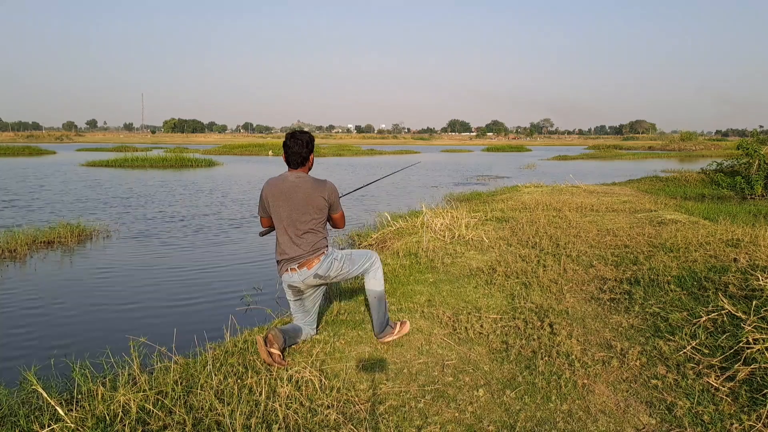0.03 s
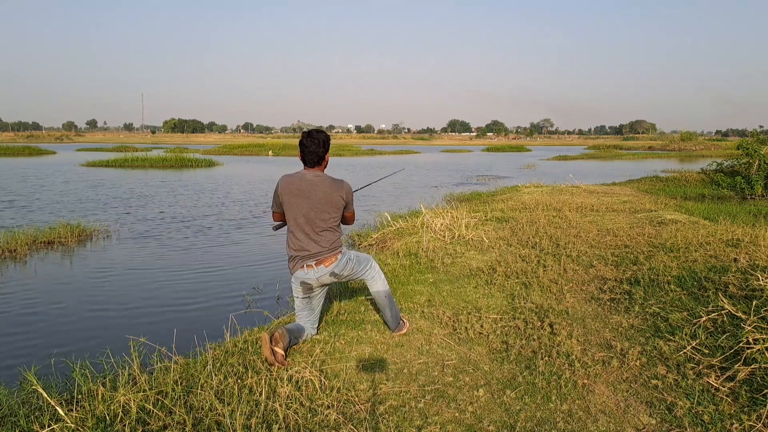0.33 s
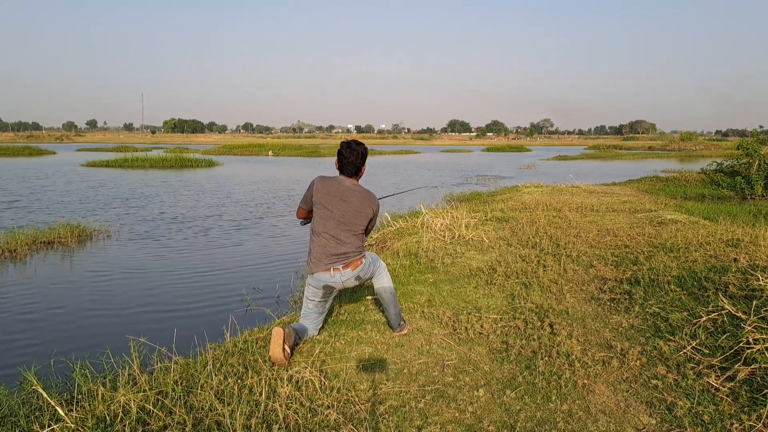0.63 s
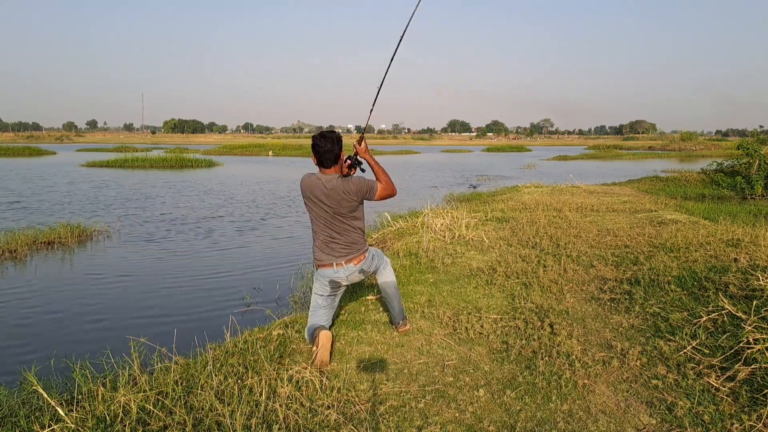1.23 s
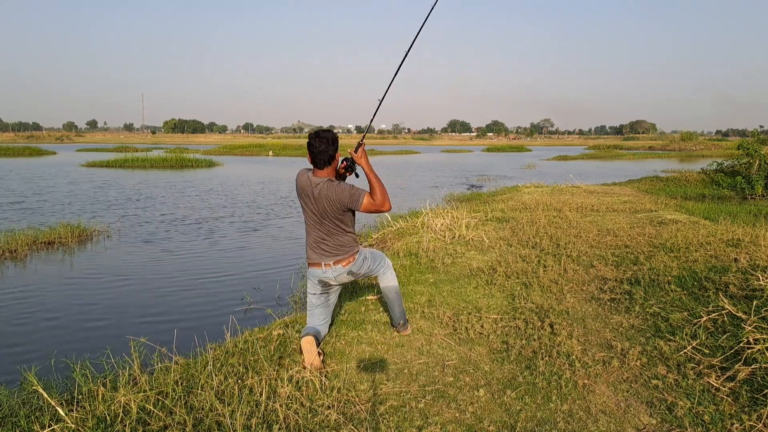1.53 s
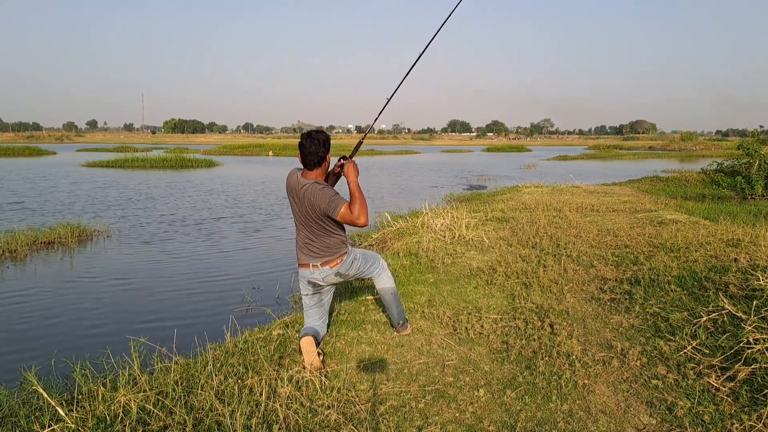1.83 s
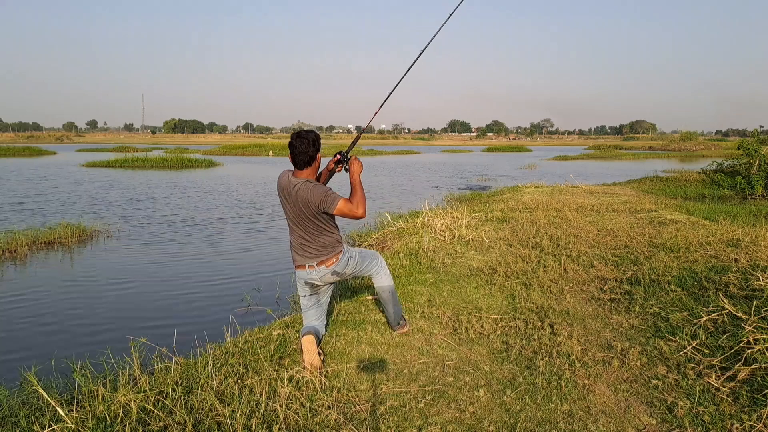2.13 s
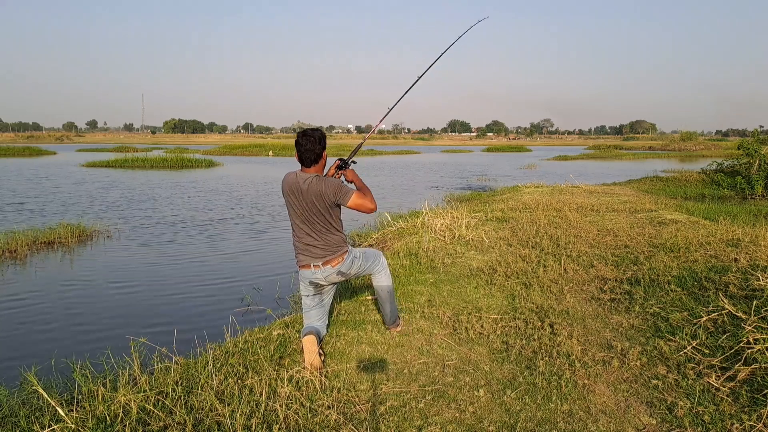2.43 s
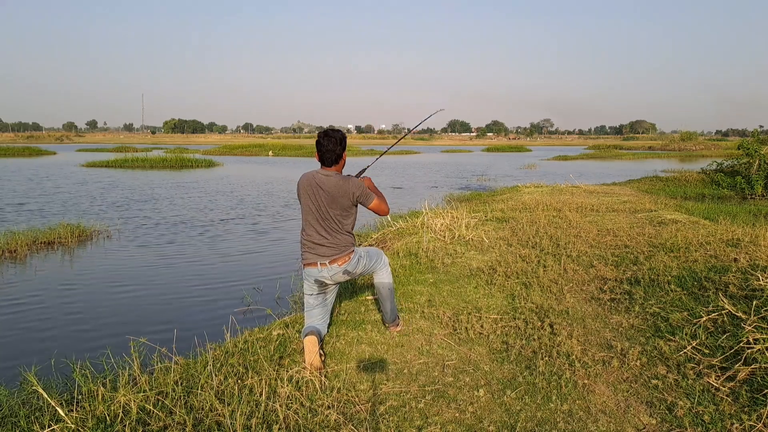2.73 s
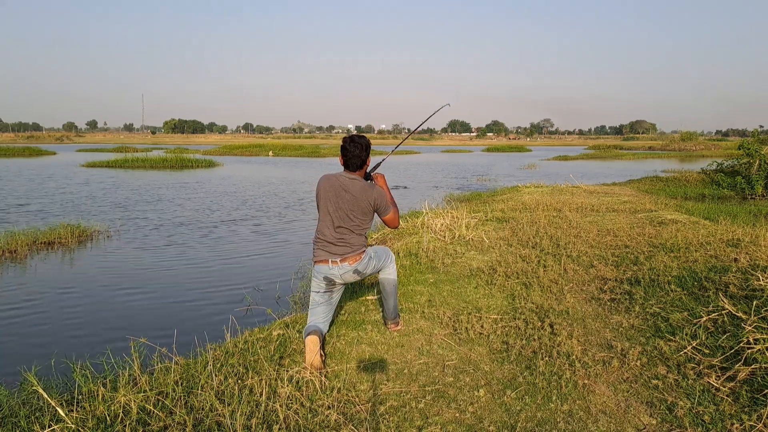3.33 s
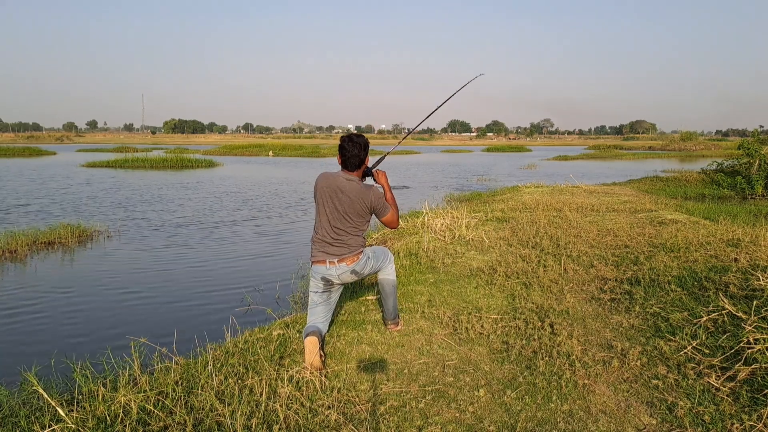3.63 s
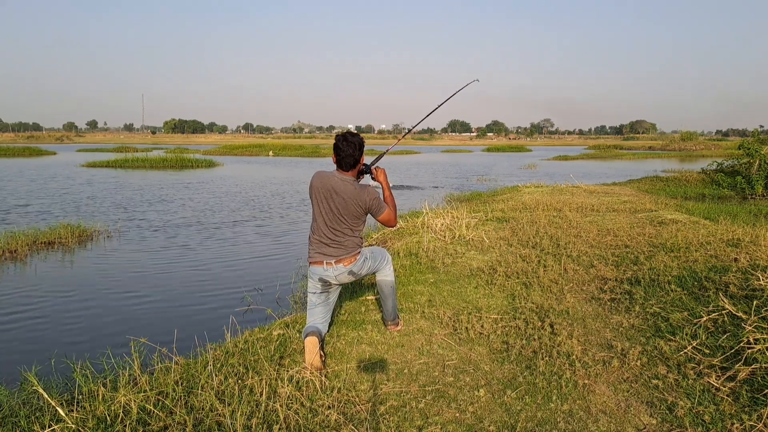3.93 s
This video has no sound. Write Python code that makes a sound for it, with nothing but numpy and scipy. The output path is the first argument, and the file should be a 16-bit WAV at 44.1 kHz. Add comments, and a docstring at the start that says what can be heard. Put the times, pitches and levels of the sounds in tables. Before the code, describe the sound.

Short, raspy bird yelps repeat nearby, answered by softer mews and distant chips across a pond. A cricket buzzes steadily louder as a fishing rod swishes and two bouts of splashing follow. Light wind bumps the microphone.

```python
"""A wading bird yelps close by on the right of a pond, its clean voice breaking into a rasp.
A second bird mews back from the left, small birds chip far off, and the banks return a thin echo.
A bush cricket buzzes in quick chirps of wing strokes over a bed of other insects.
A fishing rod whips up, the water splashes and gurgles in two bouts,
and a light wind thumps on the two microphone ports."""
import sys
import numpy as np
from scipy import signal
from scipy.fft import rfft, irfft, next_fast_len
from scipy.io import wavfile
from scipy.ndimage import map_coordinates

SR = 44100
rng = np.random.default_rng(int(sys.argv[2]) if len(sys.argv) > 2 else 0)


def transcribe(u):
    """Save the signal u as a 16-bit wav file named by the first command-line argument.

    u: samples, shape (n,) or (channels, n), limited to [-1, 1]; the rate is SR.
    q: integer samples, one column per channel.
    """
    v = np.clip(np.atleast_2d(u).T, -1, 1)
    q = np.round(v * 32767).astype(np.int16)
    wavfile.write(sys.argv[1], SR, q)


N = 176400
T = np.arange(N) / SR

# Hiss of still air. Each row: frequency in Hz, gain in dB.
AIR_SPECTRUM = [(200, 2), (600, -3), (2000, -3), (4200, -1.5), (6500, -13.5), (15500, -19.5)]
# Low end of the wind. Each row: frequency in Hz, gain in dB.
RUMBLE_SPECTRUM = [(20, -48), (35, -6.5), (52, 1.5), (75, -3.5), (110, -8), (170, -19), (300, -31.5),
                   (700, -62)]
# Eddies on the ports. Each row: centre and half-width in seconds, left and right relative level in dB.
WIND_THUMPS = [(0.404, 0.013, -37, -17), (0.488, 0.015, -35, -19), (0.968, 0.012, -32, -21),
               (1.655, 0.059, -35, -20.5), (1.853, 0.029, -22.5, -21.5), (2.741, 0.01105, -32, -22),
               (2.907, 0.022, -49, -19), (3.095, 0.0104, -24.5, -52), (3.313, 0.082, -32.5, -24.5),
               (3.511, 0.012, -31, -11.5), (3.732, 0.0081, -31.5, -16), (3.953, 0.035, -23, -16)]
# Echo off the banks. Each row: frequency in Hz, seconds to fall 60 dB.
BANK_DECAY = [(300, 0.27), (1200, 0.37), (3000, 0.25), (6000, 0.23), (12000, 0.082)]
# The insect bed. Each row: frequency in Hz, gain in dB.
INSECT_SPECTRUM = [(6500, -34.5), (7600, -19), (8150, -5), (8500, -3.5), (8900, -11), (9600, -25.5),
                   (11000, -31)]
# Faint far calls. Each row: start and length in seconds, first and last pitch in Hz, level in dB.
FAR_HOOTS = [(.56, 0.15, 596, 634.8, -52.5), (.78, 0.642, 594, 496, -54), (1.98, 0.123, 1370, 1321, -52.5)]
# Short chips of small birds and two faint, longer distant mews.
# Each row: start and length in seconds, first and last pitch in Hz, level in dB.
FAR_BIRD_NOTES = [(0.053, 0.024, 2765, 2560, -37), (2.168, 0.026, 4960, 4300, -45.5),
                  (2.278, 0.027, 4273, 3470, -40.5), (2.633, 0.024, 4300, 3220, -37.5),
                  (-.04, 0.12, 2500, 2500, -42), (1.08, 0.15, 2750, 2897, -46),
                  (1.577, .032, 4300, 3300, -43), (1.735, .04, 3000, 2650, -47),
                  (2.25, 0.031, 3800, 3760, -46), (2.94, 0.051, 2820, 2680, -40.5),
                  (3.015, 0.038, 2840, 2570, -42)]
# The cricket's pace and effort. Each row: chirp number, its end in seconds, relative level in dB.
CHIRP_KEYFRAMES = [(0, 0.084, -51.5), (4, .571, -47), (7, .901, -40.5), (10.1, 1.212, -38.5),
                   (13.88, 1.667, -37.5), (21.02, 2.504, -36), (34, 4.035, -32)]
# Air swishing past the rod. Each row: frequency in Hz, gain in dB.
WHIP_SPECTRUM = [(150, -17), (400, -6), (600, -3.5), (900, -13), (1400, -38), (4000, -25), (10000, -16.5),
                 (16000, -24)]
# Hiss of the line. Each row: frequency in Hz, gain in dB.
LINE_SPECTRUM = [(500, -6.5), (2500, 4), (5000, 4), (12000, -1), (16000, -24)]
# Sleeves and line rustling. Each row: centre in seconds, level in dB.
RUSTLES = [(.03, -48), (.95, -47.5), (1.3, -48.5), (1.85, -48.5)]
# Heaves of water. Each row: peak in seconds, level in dB, seconds to fall 60 dB.
SLOSHES = [(1.598, -29, 0.8), (3.919, -21.5, 0.1)]
# Body of a slosh. Each row: frequency in Hz, gain in dB.
SLOSH_SPECTRUM = [(70, -1), (140, 6.5), (260, -5.5), (450, -10.5), (900, -52)]
# Splashes. Each row: peak in seconds, relative level in dB, attack in seconds, seconds to fall 60 dB.
SPLASHES = [(1.41, -50.5, 0.065, 2.3), (1.594, -41, 0.078, 0.41), (1.75, -52, 0.019, 1.6),
            (3.48, -46, 0.074, 5), (3.647, -30.5, 0.022, 0.36), (3.68, -39, 0.013, 1.2),
            (3.79, -41.5, 0.052, 1), (3.913, -39, 0.025, 1.5)]
# Colour of the spray. Each row: frequency in Hz, gain in dB.
SPRAY_SPECTRUM = [(100, 7), (300, -6), (800, -3), (1700, -1.5), (3000, -7.5), (6000, -16), (11000, -21.5),
                  (16000, -34)]
# Large bubbles. Each row: start in seconds, first pitch in Hz, relative level in dB,
# rise per second as a multiple of that pitch.
BUBBLES = [(1.602, 158, -13.5, 7.7), (3.636, 764, -26, 15), (3.645, 698, -22.5, 51),
           (3.677, 1194, -27.5, 130), (3.783, 484, -28.5, 195)]
# The answering bird. Each row: start and length in seconds, top pitch in Hz, relative level in dB,
# seconds to the top, fall as a share of pitch, lift of the third and fourth harmonics in dB.
MEWS = [(.18, .11, 1412, -38.5, 0.032, 0.082, 0.5, -7), (0.537, 0.091, 1376, -40, 0.035, 0.085, -1, -1.5),
        (1.196, 0.13, 1444, -35, 0.026, 0.16, -4.5, 0), (1.841, .122, 1457, -36, 0.046, 0.15, -6.5, 4),
        (2.452, .11, 1489, -38.5, 0.022, .05, 3, 5), (2.834, 0.108, 1384, -37.5, 0.0178, 0.0305, -10, 11),
        (3.204, 0.097, 1461, -36, 0.025, 0.067, 4.5, 3), (3.604, 0.11, 1390, -32.5, 0.047, 0.052, 2, -4)]
# The answering bird's throat resonances. Each row: frequency in Hz, gain in dB.
MEW_THROAT = [(1400, -22.5), (2800, 3.5), (4250, 1), (5700, -7.5), (7100, -10), (15000, -37)]
# The near bird. Each row: start and length in seconds, pitch in Hz, relative level in dB, seconds to the
# break, level change at the break in dB, left over right in dB, share of pitch by which it starts flat.
YELPS = [(0.285, 0.11, 1245, -20, 0.044, -9, -1, 0.032), (0.82, 0.0527, 1273, -23, 0.12, -7, 3, 0.092),
         (1.366, 0.16, 1230, -23, 0.037, -6.5, -2, 0.0077),
         (2.519, 0.12, 1210, -23.5, 0.047, -8.5, -2.5, 0.0148),
         (3.423, 0.11, 1233, -25, 0.048, -7, -4, 0.063)]
# The near bird's throat resonances. Each row: frequency in Hz, gain in dB.
YELP_THROAT = [(1150, -23), (1600, -31), (2150, 0), (2480, -4), (3200, 2), (3700, 3.5), (4400, -5),
               (4950, -7), (5500, -10.5), (6150, -4), (7400, -20), (11000, -21), (15000, -28.5)]
# Hoarse noise between its harmonics. Each row: frequency in Hz, gain in dB.
HOARSE_SPECTRUM = [(1800, -34.5), (2400, 1), (3050, 1), (3900, -2), (6000, -19), (10000, -32)]


def amp(db):
    """Decibels to gain."""
    return 10 ** (np.asarray(db) / 20)


def unit(x):
    """Scale to rms 1."""
    return x / np.sqrt(np.mean(x ** 2) + 1e-20)


def along(points, hz):
    """Read a curve of (Hz, value) points on a log frequency axis."""
    freqs, values = np.transpose(points)
    return np.interp(np.log(hz + 1), np.log(freqs + 1), values)


def wobble(rate, size=N):
    """A smooth random modulator with rate knots a second."""
    knots = rng.standard_normal(size // 8 + 8)
    return map_coordinates(knots, [np.arange(size) * rate / SR], mode="wrap")


def filtered(x, response):
    """Shape x with a gain given as a function of Hz."""
    size = next_fast_len(N + SR // 2)
    return irfft(rfft(x, size) * response(np.fft.rfftfreq(size, 1 / SR)), size)[..., :N]


def noise(spectrum, width):
    """Coloured stereo noise of rms 1; width 0 is mono, 1 fully wide."""
    mid, side = filtered(rng.standard_normal((2, N)), lambda hz: amp(along(spectrum, hz)))
    return unit(np.array([mid + width * side, mid - width * side]))


def pan(db):
    """Stereo gains with the left louder by db."""
    return amp(np.array([[db], [-db]]) / 2)


def lead(x, seconds):
    """The left port hears x this much sooner; negative favours the right."""
    return filtered(x, lambda hz: np.exp(1j * np.pi * hz * seconds * np.array([[1], [-1]])))


def add(out, start, x):
    """Mix x in at start seconds."""
    i = round(start * SR)
    x = x[..., max(-i, 0):max(N - i, 0)]
    out[..., max(i, 0):max(i, 0) + x.shape[-1]] += x


def gate(t, length, attack, release):
    """Smooth attack, hold and release."""
    fade_in = np.sin(np.pi / 2 * np.clip(t / attack, 0, 1)) ** 2
    fade_out = np.sin(np.pi / 2 * np.clip((length - t) / release, 0, 1)) ** 2
    return fade_in * fade_out


def burst(peak_s, attack, t60):
    """Swell to a peak, then die away."""
    return np.exp(np.minimum(T - peak_s, 0) / attack) * amp(-60 * np.maximum(T - peak_s, 0) / t60)


def phase_of(pitch):
    """Running phase in radians of a pitch curve in Hz."""
    return 2 * np.pi * np.cumsum(pitch) / SR


def wind(thump_hz=73.1, pitch_spread=0.1639):
    """Eddies thump on each port separately, over a low rumble and still air."""
    ports = np.zeros((2, N))
    for side in range(2):
        power = sum(amp(levels[side]) ** 2 * np.exp(-((T - centre) / width) ** 2)
                    for centre, width, *levels in WIND_THUMPS)
        eddy = np.sin(phase_of(thump_hz * np.exp(pitch_spread * wobble(110))))
        buffet = noise(RUMBLE_SPECTRUM, width=0.61)[0]
        ports[side] = np.sqrt(power) * (amp(6.5) * eddy + amp(-2.5) * buffet)
    rumble = amp(-32 + 2.9 * wobble(6.54)) * noise(RUMBLE_SPECTRUM, width=0.5)
    air = amp(-57.5 + wobble(1.24)) * noise(AIR_SPECTRUM, width=0.72)
    return ports + rumble + air


def bank_echo(x):
    """A thin echo from the banks and far trees, its treble dying first."""
    hz, t, bands = signal.stft(rng.standard_normal((2, SR)), SR, nperseg=256)
    decay = amp(-60 * t / along(BANK_DECAY, hz)[:, None])
    tail = signal.istft(bands * decay, SR, nperseg=256)[1]
    return signal.fftconvolve(x, tail / np.linalg.norm(tail[0]), axes=1)[:, :N]


def insect_bed():
    """Many insects blur into a wide, high shimmer."""
    return amp(-44 + 1.6 * wobble(200) + wobble(8.14)) * noise(INSECT_SPECTRUM, width=1.0)


def far_whistles(notes, waver):
    """Distant calls: thin gliding sine notes with a waver in pitch."""
    out = np.zeros(N)
    for start, length, first_hz, last_hz, db in notes:
        t = np.arange(int(length * SR)) / SR
        glide = first_hz + (last_hz - first_hz) * t / length
        pitch = glide * (1 + waver * wobble(396, len(t)))
        envelope = amp(db) * gate(t, length, attack=length / 2, release=length / 2)
        add(out, start, envelope * np.sin(phase_of(pitch)))
    return out * pan(1)


def far_chatter(count=30, level_db=-54):
    """Tiny distant birds scatter falling chips at random moments."""
    notes = []
    for when, tune, size in rng.random((count, 3)):
        hz = 3000 + 2500 * tune
        notes.append((when * N / SR, 0.03, hz, 0.87 * hz, level_db + 10 * (size - 0.5)))
    return far_whistles(notes, waver=0.033)


def cricket(strokes_per_s=120, stroke_s=0.0015, top_hz=8840, fall_hz_per_s=151000):
    """Wing strokes, each a falling ping, grow louder and higher through every chirp."""
    out, t = np.zeros(N), np.arange(-SR // 150, SR // 150) / SR
    envelope = np.exp(-np.abs(t / stroke_s) ** 1.164)
    numbers, ends, levels = np.transpose(CHIRP_KEYFRAMES)
    for chirp in range(35):
        end, db = np.interp(chirp, numbers, ends), np.interp(chirp, numbers, levels)
        for stroke, (late, size, tune) in enumerate(rng.standard_normal((12, 3))):
            before_end_s = stroke / strokes_per_s
            early = before_end_s / 0.12  # 0 on the chirp's last stroke
            hz = top_hz - 260 * early + 35 * tune
            ping = envelope * np.sin(2 * np.pi * (hz * t - fall_hz_per_s * t * t / 2))
            gain = amp(db + 7 + 1.5 * size - 20 * early ** 4.5)
            add(out, end - before_end_s + 0.00022 * late, gain * ping)
    return lead(out * pan(-6.5), -0.000021)


def rod():
    """The rod whips through the air, the line snaps tight, and sleeves and line rustle."""
    swish = amp(-28.5) * burst(1.019, attack=0.00856, t60=0.093) * noise(WHIP_SPECTRUM, width=0.18)
    snap = amp(-18) * burst(1.0203, attack=0.0003, t60=0.003)
    snap_tail = amp(-40.5) * burst(1.04, attack=0.018, t60=0.77)
    rustle = sum(amp(db) * np.exp(-((T - centre) / 0.12) ** 2) for centre, db in RUSTLES)
    grain = unit(amp(4.5 * wobble(450)))
    return swish + (snap + grain * (snap_tail + rustle)) * noise(LINE_SPECTRUM, width=1.0)


def slosh():
    """Heavy water heaves low under the splashes."""
    envelope = sum(amp(db) * burst(peak_s, attack=0.017, t60=t60) for peak_s, db, t60 in SLOSHES)
    return envelope * noise(SLOSH_SPECTRUM, width=0.3)


def gurgle(attack_s=0.0011, t60=0.04):
    """Large bubbles ring briefly, rising in pitch."""
    out, t = np.zeros(N), np.arange(SR // 10) / SR
    for start, hz, db, rise in BUBBLES:
        envelope = amp(db + 6 - 60 * t / t60) * (1 - np.exp(-t / attack_s))
        add(out, start, envelope * np.sin(2 * np.pi * hz * t * (1 + rise * t / 2)))
    return out


def splashes(bubble_count=1200):
    """Grainy spray and a fizz of tiny rising bubbles swell and fade with each splash."""
    power = sum((amp(db) * burst(peak_s, attack, t60)) ** 2 for peak_s, db, attack, t60 in SPLASHES)
    fizz, t = np.zeros(N), np.arange(900) / SR
    for when, tune, size in rng.random((bubble_count, 3)):
        cycles = t * 500 * 6 ** tune  # starting pitches from 500 to 3000 Hz
        envelope = size ** 3 * np.exp(-cycles / 3) * (1 - np.exp(-cycles))
        add(fizz, when * N / SR, envelope * np.sin(2 * np.pi * cycles * (1 + 0.014 * cycles)))
    spray = amp(1.5 + 2.7 * wobble(220)) * noise(SPRAY_SPECTRUM, width=0.35)
    return np.sqrt(power) * (spray + amp(-7) * unit(fizz))


def bird_voice(pitch, throat, rasp, rasp_hz, tilt_db=0, lifts_db={}):
    """Twelve harmonics through a throat, tilted per octave about the third; rasp makes each flutter."""
    phase, out = phase_of(pitch), np.zeros(len(pitch))
    for k in range(1, 13):
        gain = amp(along(throat, k * pitch) + tilt_db * np.log2(k / 3) + lifts_db.get(k, 0))
        level_flutter = rasp * wobble(rasp_hz, len(pitch))
        phase_flutter = rasp * wobble(rasp_hz, len(pitch))
        out += gain * ((1 + level_flutter) * np.sin(k * phase) + phase_flutter * np.cos(k * phase))
    return out


def answering_bird(scoop=0.09, jitter=0.003, dip_at_s=2.895):
    """Softer mews from the left that arch up and sink."""
    out = np.zeros(N)
    for start, length, hz, db, top_s, fall, third_db, fourth_db in MEWS:
        t = np.arange(int(length * SR)) / SR
        flat_start = scoop * np.maximum(1 - t / top_s, 0) ** 2
        sink = fall * np.maximum((t - top_s) / (length - top_s), 0) ** 1.293
        dip = 0.05 * np.exp(-((start + t - dip_at_s) / 0.0198) ** 2)  # one mew dips midway
        pitch = hz * (1 - flat_start - sink) * (1 - dip) * (1 + jitter * wobble(300, len(t)))
        call = bird_voice(pitch, MEW_THROAT, rasp=0.32, rasp_hz=450, lifts_db={3: third_db, 4: fourth_db})
        add(out, start, call * amp(db) * gate(t, length, attack=0.015, release=0.022))
    return lead(out * pan(2.6), 0.0005)


def near_bird(scoop_s=0.0146, break_blend_s=0.00663, break_drop=0.128, sag=0.04):
    """Yelps start clean; most break to a lower, duller note whose hoarseness pulses at its pitch."""
    out, hoarse = np.zeros((2, N)), noise(HOARSE_SPECTRUM, width=0)[0]
    for start, length, hz, db, break_s, change_db, pan_db, scoop in YELPS:
        t = np.arange(int(length * SR)) / SR
        broken = 0.5 + 0.5 * np.tanh((t - break_s) / (2 * break_blend_s))  # 0 clean, 1 broken
        frayed = broken * (t / length) ** 2  # the note roughens toward its end
        jitter = (0.004 + 0.022 * frayed) * wobble(354.4, len(t))
        pitch = hz * (1 - scoop * np.exp(-t / scoop_s)) * (1 - break_drop * broken)
        pitch *= 1 - sag * frayed ** 2 + jitter
        tone = bird_voice(pitch, YELP_THROAT, rasp=0.2 + 0.3 * frayed, rasp_hz=449.3,
                          tilt_db=-5.5 * broken)
        breath = hoarse[int(start * SR):][:len(t)] * (1 + 0.5 * np.cos(phase_of(pitch)))
        breath *= amp(-26 + 22 * broken * t / length + 5.4 * wobble(182, len(t)))
        call = tone * (1 - frayed / 2) + breath
        envelope = amp(db + change_db * broken) * gate(t, length, attack=0.013, release=0.02)
        add(out, start, pan(pan_db) * envelope * call)
    return lead(out, -0.000385)


def scene():
    """The pond mix; only the birds feed the echo."""
    near = near_bird()
    far = answering_bird() + far_whistles(FAR_BIRD_NOTES, waver=0.019)
    far += far_whistles(FAR_HOOTS, waver=0.05) + far_chatter()
    birds = near + far + amp(-13) * bank_echo(near) + amp(-11) * bank_echo(far)
    return birds + cricket() + insect_bed() + splashes() + gurgle() + slosh() + rod() + wind()


def record(dry):
    """A brick-wall low-pass trims the very top."""
    return filtered(dry, lambda hz: hz < 15850)


dry = scene()
out = record(dry)
transcribe(out)
```